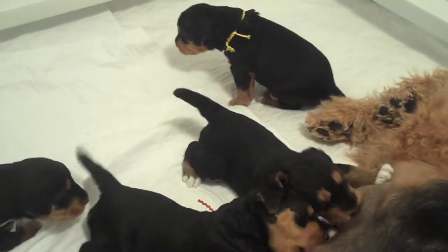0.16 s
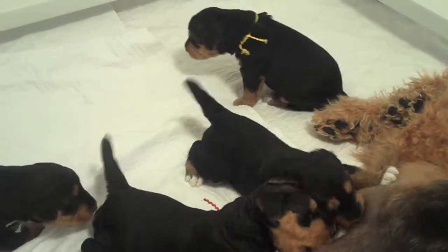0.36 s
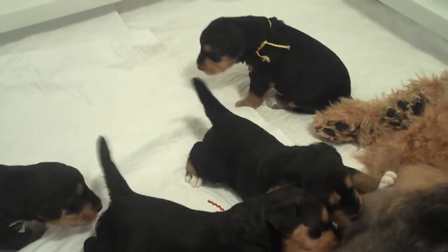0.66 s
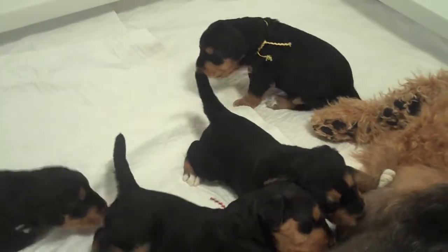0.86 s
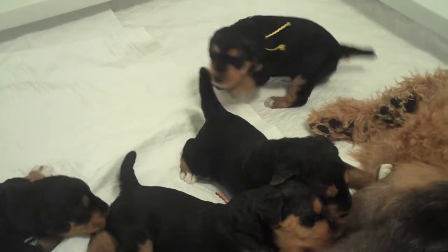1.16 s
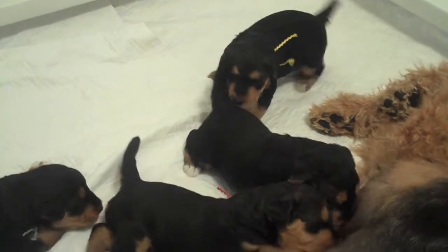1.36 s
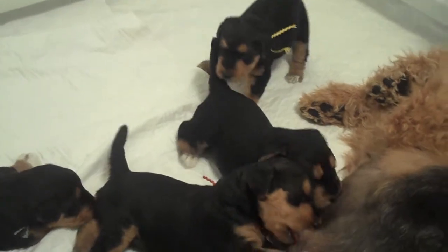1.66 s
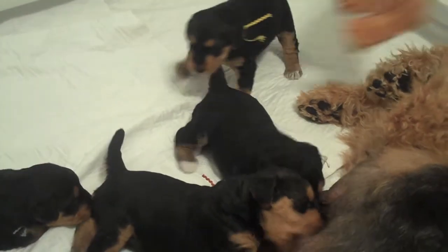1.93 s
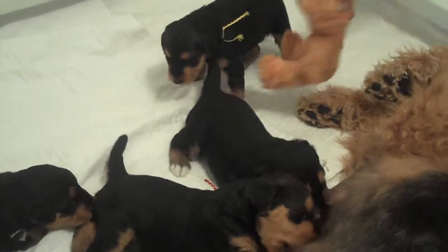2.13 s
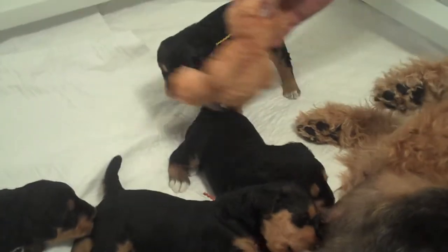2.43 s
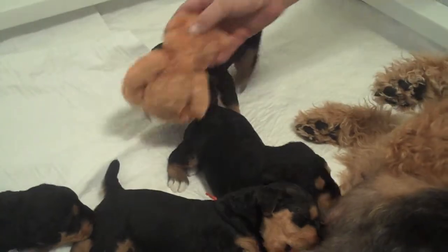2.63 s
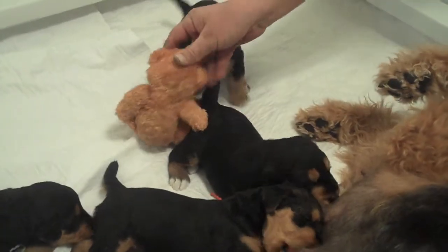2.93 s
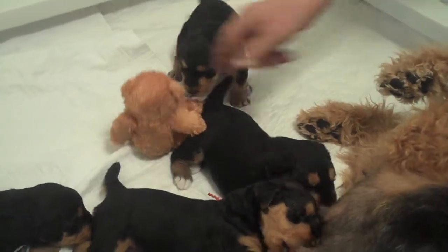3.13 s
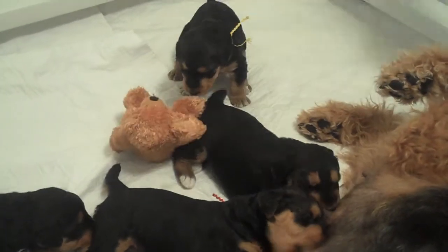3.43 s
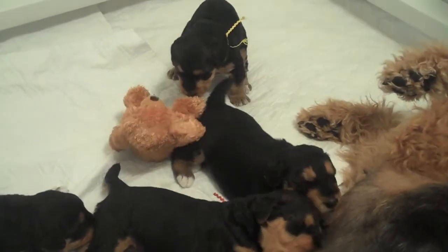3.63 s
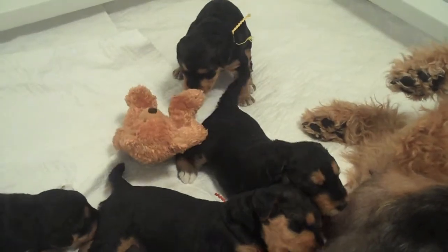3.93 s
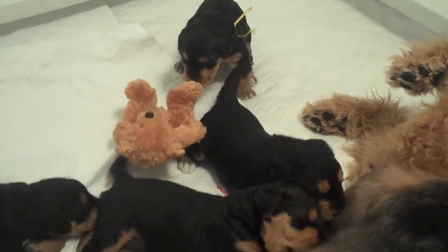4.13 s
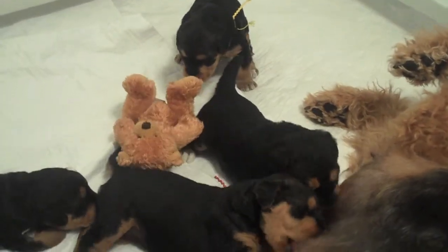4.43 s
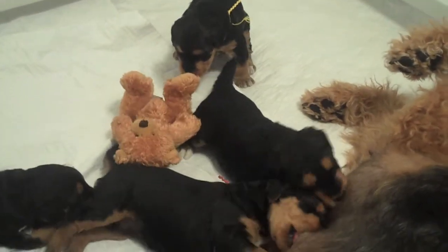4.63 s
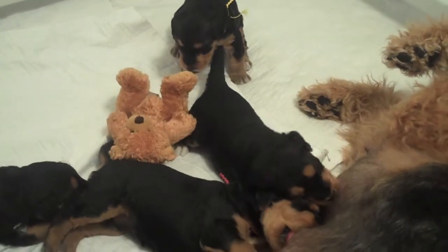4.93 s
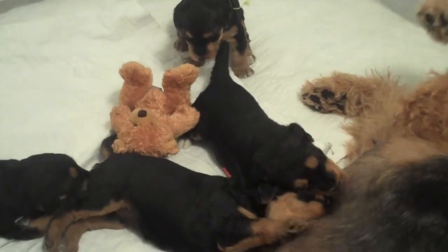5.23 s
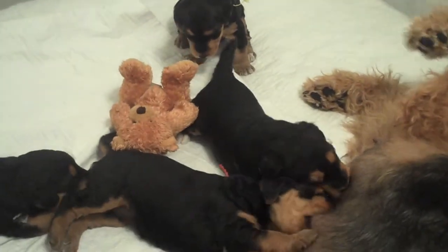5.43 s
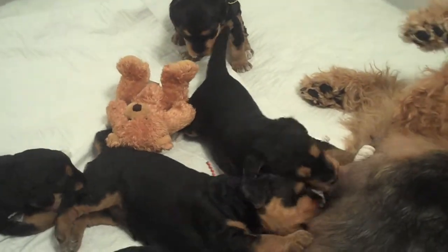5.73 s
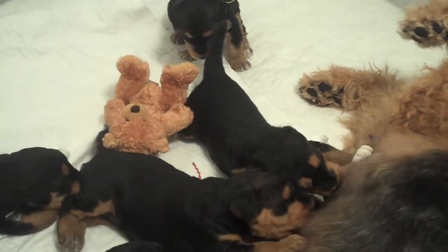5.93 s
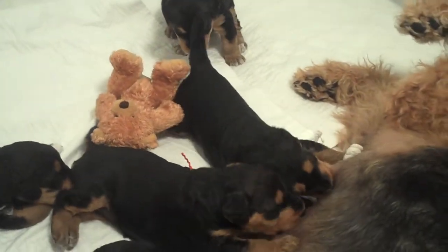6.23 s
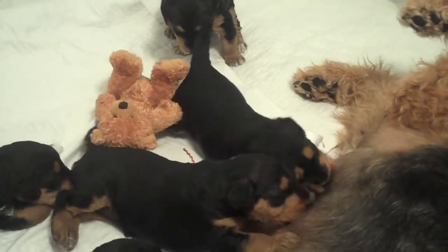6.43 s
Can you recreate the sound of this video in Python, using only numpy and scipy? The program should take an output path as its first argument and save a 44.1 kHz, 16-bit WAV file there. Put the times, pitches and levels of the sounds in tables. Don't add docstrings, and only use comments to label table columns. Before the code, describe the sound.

One brief piercing puppy squeal indoors, followed by quiet bedding rustle, paw scuffs, little clicks, close snaps and a faint metallic tinkle.

```python
import sys
import numpy as np
from scipy import signal
from scipy.fft import rfft, irfft, next_fast_len
from scipy.io import wavfile
from scipy.ndimage import uniform_filter1d, map_coordinates

SR = 44100
rng = np.random.default_rng(int(sys.argv[2]) if len(sys.argv) > 2 else 0)


def waveform_to_disk(signal):
    frames = np.transpose(np.atleast_2d(signal))
    scaled = np.clip(frames, -1, 1) * 32767
    samples = np.round(scaled).astype(np.int16)
    wavfile.write(sys.argv[1], SR, samples)


def nominal_scale(level):
    x = np.asarray(level, float) / 20
    return 10 ** x


N = 290001

# time_s, pitch_hz, effort_db, mouth (tuned to partial 1 at 0, to partial 2 at 1), strain_db (upper partials)
WHIMPER = [
    (.433, 1296, -62, .23, -20),
    (.443, 1290, -48.5, .02, -25),
    (.468, 1280, -43, .01, -18.5),
    (.482, 1267, -47.5, .08, -19.5),
    (.495, 1219, -47.5, .12, -17),
    (.52, 1185, -57.5, .3, -14.5),
    (.55, 1163, -41.7, .45, -28),
    (.562, 1210, -66.5, .35, -22.5),
]
# time_s, pitch_hz, effort_db, mouth, strain_db
SQUEAL_PINCHED = [
    (.793, 1053, -52.5, 0.47, -25.5),
    (.806, 1033, -36.5, 0.31, -24.5),
    (.835, 1137, -28, 0.51, -33.5),
    (.845, 1078, -21, 0.9, -23),
    (.885, 1092, -18, .68, -37),
    (.93, 1188, -33, 0.58, -13.5),
]
# time_s, pitch_hz, effort_db, mouth, strain_db
SQUEAL_OPEN = [
    (.96, 1284, -16.5, 0.48, -18.5),
    (0.999, 1445, -14.2, .22, -17.5),
    (1.064, 1328, -17, 0.0091, -26),
    (1.082, 1244, -21, .18, -26.5),
    (1.138, 1007, -29, .48, -23),
    (1.16, 906, -22, 0.27, -34.5),
    (1.189, 761, -27.5, 0.12, -28),
    (1.215, 707.6, -22.5, 0.44, -47),
    (1.24, 717, -51, 0.34, -36),
]
# crest_s, rate_hz
FLUTTER = (.848, 27)
# freq_hz, level_db
THROAT = [(2600, -8.5), (3250, -14.5), (3900, 1), (4400, 3), (4850, -1.5), (5300, 2.5), (5900, -6),
          (6400, -18), (7000, -17), (8300, -20.5), (10000, -26), (12000, -49)]
# freq_hz, level_db
NOSE = [(2600, -20), (3900, -24), (4800, 0.5), (5200, 8), (6000, -11), (7500, -10), (13000, -35)]
# start_s, level_db, pitch_hz, glide_hz_per_s, length_s
SQUEAKS = [
    (0.338, -71, 4400, 3000, 0.037),
    (0.505, -61, 11300, 9000, 0.038),
    (0.925, -52.5, 237, 14, 0.03),
    (1.168, -43, 620, -3000, 0.0067),
    (1.291, -45, 2504, 0, 0.0035),
    (2.306, -61.5, 2254, 1.5, .03),
    (2.342, -59.5, 2204, -1, 0.025),
    (2.31, -67.5, 4970, 4, 0.035),
    (2.34, -64.5, 4930, -1, 0.024),
]
# delay_s, level_db
PEN_WALLS = [(.0043, -16), (.009, -14), (.0137, -13), (.019, -11), (.026, -16)]
# start_s, peak_db, dull_db
SMACKS = [(0.3705, -51.5, 12.5), (.6245, -47, 8), (.7257, -45, 7.5), (1.3041, -44.5, 10.5),
          (1.9884, -52.5, 8), (2.303, -46.5, 9), (2.4693, -50, 13.5), (2.5706, -42.5, 5.5),
          (2.607, -47, 9.5), (2.6842, -40, 6.5), (3.4572, -58, 15), (3.4935, -60.5, 18),
          (3.631, -50.5, 12.5), (3.662, -60, 17), (3.693, -44, 7), (3.7462, -48, 8), (3.841, -43.5, 8),
          (4.009, -46, 15), (4.103, -61, 21), (4.1806, -60, 22), (4.2314, -40.5, 12.5), (5.0384, -59.5, 12),
          (5.167, -55, 9.5), (5.343, -40, 8), (5.985, -56, 16.5), (6.407, -56.5, 21)]
# start_s, peak_db, bright_db
CLAWS = [(.426, -46.5, -6), (0.7217, -52, 3), (1.4865, -41, -32), (1.593, -56, 14), (1.9433, -53.5, -16),
         (2.0078, -49, -9.5), (2.1058, -47.5, -2), (2.3157, -47, -6), (2.6548, -46.5, -7),
         (2.9597, -53, -3), (3.2198, -58.5, 1), (3.404, -59, -10.5), (3.501, -60, -24), (3.5991, -39.5, -8),
         (3.9165, -33, -1.5), (4.0504, -43.5, -4.5), (4.7496, -39, -3), (5.205, -47, -10), (5.454, -44, 3),
         (5.6377, -58, -3), (5.678, -55.5, 1.5), (5.816, -42.5, 2), (6.325, -54, -11.5), (5.12, -56, 2.5),
         (5.225, -58.5, -6), (6.2894, -56.5, -5.5)]
# start_s, peak_db
KNEADS = [(4.3088, -43), (4.41, -48.5), (4.451, -45), (4.4754, -42), (4.505, -56), (4.562, -63),
          (4.572, -48.5), (4.6072, -44), (4.6298, -44), (4.6544, -41.5), (4.6754, -41)]
# start_s, level_db, dull_db, bright_db, length_s
LEADS = [
    (0.279, -52, -5, -3, 0.0021),
    (1.489, -53, -11, 6, .003),
    (3.899, -53, 8, -16, .003),
]
# start_s, peak_db, dull_db, bright_db, length_s
SNAPS = [
    (1.5008, -30, -1.5, -25, 0.002),
    (3.9135, -29, -7.5, 7.5, 0.0013),
    (3.9147, -25, -24, -1, 0.0012),
    (4.2128, -24, 0, -16, 0.002),
]
# start_s, peak_db, dull_db, bright_db, length_s
SCUFFS = [(0.374, -47.5, 11, -13, 0.027), (0.62, -61, -4.5, -14, 0.032), (1.502, -41, 4, -43, 0.042),
          (1.612, -51, -7, 3.5, 0.05), (1.671, -50, 11, -1.5, 0.067), (2.477, -68, 6, -12, 0.025),
          (2.562, -58, -12, -13, 0.04), (2.6874, -48, 3, 6.5, 0.032), (3.595, -58, -8, -14, 0.027),
          (3.692, -64, -10, -14, 0.024), (3.75, -54, -10, 0, 0.041), (4.003, -45.5, -10, -9, 0.052),
          (4.219, -35.5, 5.5, 0, 0.031), (4.556, -62, 3, -9, 0.04), (4.7565, -41, 8, -6, 0.096),
          (5.3436, -40, 8, -2.5, 0.1), (5.99, -50, -1.5, -9, 0.15), (6.4056, -53, 3, 0, 0.04)]
# start_s, level_db, dull_db, bright_db, length_s
PADS = [
    (.385, -73, 7, -3, .03),
    (.6, -64.5, 19, -15.5, 0.021),
    (.9, -64.5, 20, 9, 0.04),
    (1.06, -77.5, 32, -6, 0.035),
    (1.88, -63.5, 17.5, -1, 0.02),
    (2.6, -67, 15, 0, .05),
    (3.115, -60, 15.5, -1, 0.038),
    (3.56, -69, 13, 0, .06),
    (5.343, -66.5, 14, 1, .06),
    (6.47, -67.5, 13, 7, 0.049),
]
# freq_hz, level_db
PADDING = [(120, 4.5), (300, 17), (700, 2.5), (1300, -7.5), (2200, -30.5)]
# start_s, level_db, pitch_hz, length_s
THUMPS = [
    (3.9135, -28, 460, 0.00097),
    (3.914, -42, 3.4, 0.077),
    (4.275, -46, 9.5, 0.032),
]
# start_s, level_db, lowest_mode_db
TINKLES = [
    (5.456, -44, -14.5),
    (5.68, -61.5, -14.5),
    (5.816, -41.5, -2),
    (5.827, -46.5, 7.5),
]
# freq_hz, level_db, t60_s
TAG_MODES = [(9997, -7, 0.11), (10400, -7, 0.05), (11170, 0, 0.09), (12000, -12, 0.1)]
# start_s, length_s, weight_db (on padding), brush_db (on cloth)
DRAGS = [(-.1, 0.69, -81.5, -81), (0.354, 0.2, -69.5, -68.5), (0.648, 0.81, -65, -71.5),
         (1.542, 0.26, -71.5, -74), (1.852, 0.71, -77.5, -77), (2.535, 0.17, -60.5, -75),
         (2.8, 0.55, -75.5, -78.5), (3.338, 0.44, -65.5, -78.5), (3.8, 0.097, -77, -76),
         (3.951, 0.37, -60.5, -87), (4.208, 0.43, -57.5, -69.5), (4.55, .13, -62, -74),
         (4.9, 0.53, -79, -78), (5.38, 0.17, -71, -81.5), (5.602, 0.3, -79.5, -75),
         (5.921, 0.33, -71.5, -76), (5.963, 0.17, -78, -69.5), (6.36, .25, -73, -74)]
# freq_hz, level_db
BOARDS = [(80, -15.5), (160, -3.5), (300, -0.5), (450, -6), (700, -28.5)]
# freq_hz, level_db
BEDDING = [(450, -25.5), (700, -9), (880, 0.5), (1100, -1), (1400, -4), (2100, -6), (3000, -12.5),
           (5000, -31)]
# freq_hz, level_db
FABRIC = [(1800, -23.5), (3000, -3.5), (5000, 3.5), (7500, 4), (9000, -4), (11000, -20.5)]
# freq_hz, level_db
FUR = [(6500, -20), (9000, -5), (11000, -0.5), (13000, 1), (14500, -4.5)]
# freq_hz, t60_s
ROOM = [(200, .4), (1000, 0.35), (4000, .3), (12000, 0.22)]
# freq_hz, level_db_per_hz
HISS = [(4.7, -28), (8.0, -1.5), (21, -6), (48, -9.5), (205, -16), (291, -12.5), (438, -14.5),
        (1750, -17.5), (3500, -22), (12300, -36), (13600, -36.5), (14900, -63)]

MOUTH_LOSS_DB = 33
FLUTTER_OPEN, FLUTTER_PINCHED = .025, .053


def unit(x):
    return x / np.sqrt(np.mean(x ** 2) + 1e-20)


def along(points, hz):
    f, v = np.transpose(points)
    return np.interp(np.log(hz + 1), np.log(f + 1), v)


def curves(rows):
    s, *cols = np.transpose(rows)
    return [np.interp(np.arange(N) / SR, s, c) for c in cols]


def wobble(rate_hz):
    knots = rng.standard_normal(int(N * rate_hz / SR) + 4)
    return map_coordinates(knots, [np.arange(N) * rate_hz / SR])


def coloured(x, spectrum):
    m = next_fast_len(len(x) + 8192)
    gain = nominal_scale(along(spectrum, np.fft.rfftfreq(m, 1 / SR)))
    return irfft(rfft(x, m) * gain, m)[:len(x)]


def voice(call, throat, flutter, jitter, rough, breath_db):
    pitch_hz, effort_db, mouth, strain_db = curves(call)
    first_db = effort_db - MOUTH_LOSS_DB * mouth
    second_db = effort_db - MOUTH_LOSS_DB * (1 - mouth)
    upper_db = effort_db + strain_db
    t = np.arange(N) / SR
    sounding = (t > call[0][0]) & (t < call[-1][0])

    crest_s, flutter_hz = FLUTTER
    depth = flutter * (FLUTTER_OPEN + (FLUTTER_PINCHED - FLUTTER_OPEN) * mouth)
    flutter_wave = depth * np.cos(2 * np.pi * flutter_hz * (t - crest_s))
    pitch_hz = pitch_hz * (1 + flutter_wave + jitter * wobble(150))
    phase = 2 * np.pi * np.cumsum(pitch_hz) / SR

    low = nominal_scale(first_db) * np.sin(phase) + nominal_scale(second_db) * np.sin(2 * phase)
    upper = np.zeros(N)
    for k in range(3, 10):
        gain = nominal_scale(along(throat, k * pitch_hz) + 4.5 * wobble(90))
        upper += gain * np.sin(k * phase + rough * k * k * wobble(500))
    breath_colour = [(700, -37.0), (1600, 1.5)] + throat
    breath = nominal_scale(breath_db) * unit(coloured(rng.standard_normal(N), breath_colour))
    return np.sqrt(2) * sounding * (low + nominal_scale(upper_db) * (upper + breath))


def squeaks():
    out, t = np.zeros(N), np.arange(N) / SR
    for start_s, level_db, pitch_hz, glide_hz_per_s, length_s in SQUEAKS:
        age_s = t - start_s
        swell = np.sin(np.pi * np.clip(age_s / length_s, 0, 1))
        out += nominal_scale(level_db) * swell * np.sin(2 * np.pi * (pitch_hz + glide_hz_per_s * age_s / 2) * age_s)
    return out


def pen(x):
    return x + sum(nominal_scale(db) * np.roll(x, round(delay_s * SR)) for delay_s, db in PEN_WALLS)


def bursts(events, rise_s, wet_db, gain_db, dull_hz):
    out, t = np.zeros(N + SR), np.arange(SR // 6) / SR
    lead = 256
    for start_s, level_db, dull_db, bright_db, length_s in events:
        envelope = nominal_scale(-20 * t / max(length_s, .001)) * (1 - np.exp(-t / rise_s))
        crack = rng.standard_normal(len(t)) * envelope
        tones = rfft(np.pad(crack, (lead, 0)))
        tones /= np.sqrt(uniform_filter1d(np.abs(tones) ** 2, size=160))
        crack = irfft(tones) * np.sqrt(0.069 * length_s * SR)
        dull = [(250, dull_db - 18.5), (.55 * dull_hz, dull_db - 2.5),
                (dull_hz, dull_db + 4.5), (1.5 * dull_hz, dull_db + 2.0)]
        bright = [(3500, 0.012), (5200, 0), (7500, bright_db / 2 - 0.5), (10500, bright_db - 1)]
        crack = coloured(crack, dull + bright)
        heard = nominal_scale(wet_db) * signal.fftconvolve(crack, tail(gap_s=0.0031))
        heard[:len(crack)] += crack
        out[round(start_s * SR) - lead:][:len(heard)] += nominal_scale(level_db + gain_db) * heard
    return out[:N]


def clicks():
    smacks = [(s, peak_db, dull_db, -5, .004) for s, peak_db, dull_db in SMACKS]
    claws = [(s, peak_db, -5, bright_db, .004) for s, peak_db, bright_db in CLAWS]
    kneads = [(s, peak_db, 3.5, -8, .0045) for s, peak_db in KNEADS]
    events = smacks + claws + kneads + LEADS
    return bursts(events, rise_s=0.00069, wet_db=-2.5, gain_db=4.5, dull_hz=1145)


def snaps():
    return bursts(SNAPS, rise_s=0.0001, wet_db=-20.5, gain_db=9.0, dull_hz=1660)


def scuffs():
    return bursts(SCUFFS, rise_s=0.0032, wet_db=-8, gain_db=-2.0, dull_hz=1310)


def landings():
    return coloured(bursts(PADS, rise_s=0.011, wet_db=-5.5, gain_db=6, dull_hz=1300), PADDING)


def thumps():
    out, t = np.zeros(N), np.arange(N) / SR
    for start_s, level_db, pitch_hz, length_s in THUMPS:
        age = np.clip(t - start_s, 0, None) / length_s
        pulse = age * np.exp(1 - 2 * age)
        out += nominal_scale(level_db) * pulse * np.cos(2 * np.pi * pitch_hz * (t - start_s))
    return out


def tag():
    out, t = np.zeros(N), np.arange(SR // 4) / SR
    rise = 1 - np.exp(-t / 0.0015)
    for start_s, level_db, lowest_db in TINKLES:
        rings = [nominal_scale(db - 60 * t / t60_s) * np.sin(2 * np.pi * hz * t) for hz, db, t60_s in TAG_MODES]
        ring = nominal_scale(lowest_db) * rings[0] + sum(rings[1:])
        out[round(start_s * SR):][:len(t)] += nominal_scale(level_db) * ring * rise
    return out


def drags():
    power, t = np.zeros((2, N)), np.arange(N) / SR
    for start_s, length_s, weight_db, brush_db in DRAGS:
        swell = np.clip((t - start_s) / 0.1, 0, 1) ** 2
        fade_db = -88.5 * np.clip(t - start_s - length_s, 0, None)
        power += (nominal_scale([[weight_db], [brush_db]]) * swell * nominal_scale(fade_db)) ** 2
    return np.sqrt(power + 1e-12)


def crackle(rate_hz, spread_db, smooth_share):
    hits = rng.random(N) < rate_hz / SR * nominal_scale(5 * wobble(30))
    sizes = nominal_scale(spread_db * rng.exponential(1, N))
    slips = unit(hits * sizes * rng.choice([-1, 1], N))
    return unit(slips + smooth_share * rng.standard_normal(N))


def rustle():
    weight, brush = drags()
    boards = np.hypot(nominal_scale(-15) * weight, nominal_scale(-80))
    layers = [(boards, BOARDS), (weight, BEDDING), (brush, FABRIC), (nominal_scale(-1) * brush, FUR)]
    busy = np.clip((20 * np.log10(weight) + 72) / 12, 0, 1)
    slips = crackle(rate_hz=1300, spread_db=3.0, smooth_share=.9)
    slips = busy * slips + np.sqrt(1 - busy ** 2) * rng.standard_normal(N)
    slips = nominal_scale(2.6 * busy * wobble(45)) * slips
    return sum(gain * nominal_scale(1.2 * wobble(14)) * unit(coloured(slips, body)) for gain, body in layers)


def tail(gap_s):
    hz, t, z = signal.stft(rng.standard_normal(SR // 3), SR, nperseg=256)
    decay = nominal_scale(-60 * t / along(ROOM, hz)[:, None])
    echo = signal.istft(z * decay, SR, nperseg=256)[1]
    return np.pad(echo / np.linalg.norm(echo), (round(gap_s * SR), 0))


def room(x, wet_db):
    return x + nominal_scale(wet_db) * signal.fftconvolve(x, tail(gap_s=.006))[:N]


def microphone_hiss():
    return nominal_scale(-69.66) * unit(coloured(rng.standard_normal(N), HISS))


def scene():
    whimper = voice(WHIMPER, NOSE, flutter=.4, jitter=.003, rough=.025, breath_db=-10)
    squeal = voice(SQUEAL_PINCHED + SQUEAL_OPEN, THROAT, flutter=1, jitter=.006, rough=.016, breath_db=-13)
    pups = nominal_scale(-1.5) * room(whimper + pen(squeal) + squeaks(), wet_db=-10)
    touches = clicks() + snaps() + scuffs() + landings()
    moving = nominal_scale(-0.5) * room(rustle(), wet_db=-8.5) + tag() + thumps()
    return (pups + touches + moving)[None]


def band_limit(x):
    return signal.sosfilt(signal.butter(12, 15070, fs=SR, output="sos"), x)


def record(dry):
    top_hz = 14050
    band = [(top_hz - 150, 0), (top_hz + 250, -22), (top_hz + 1000, -45)]
    limited = coloured(dry[0] + microphone_hiss(), band)
    mix = limited[None] - .0004
    return band_limit(mix)


dry = scene()
out = record(dry)
waveform_to_disk(out)
```